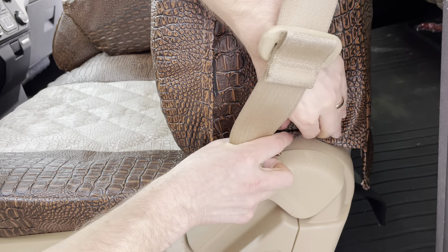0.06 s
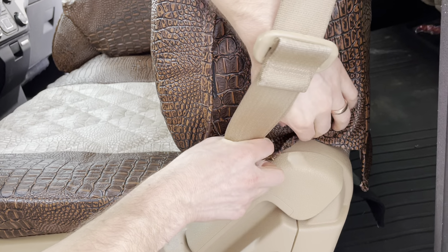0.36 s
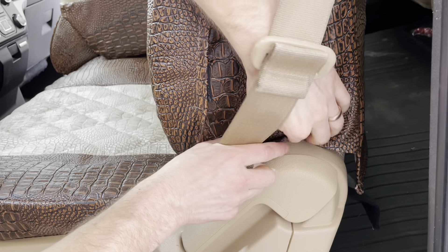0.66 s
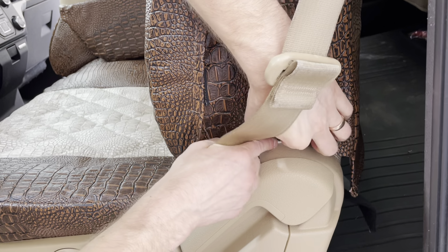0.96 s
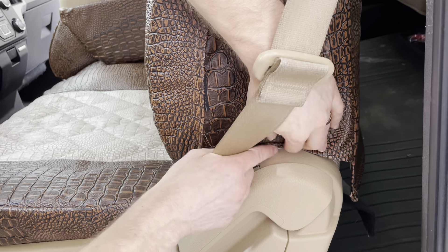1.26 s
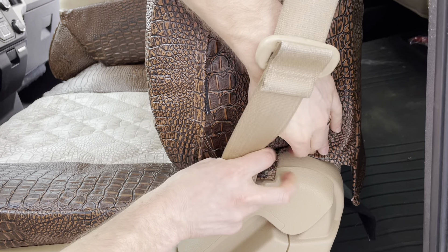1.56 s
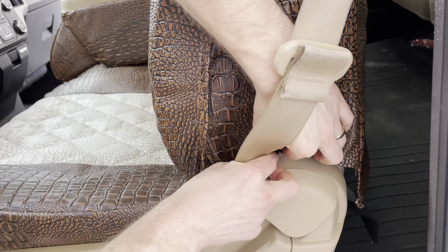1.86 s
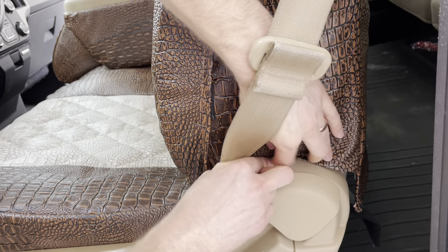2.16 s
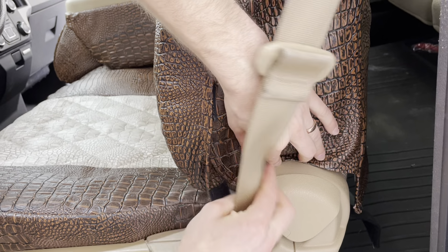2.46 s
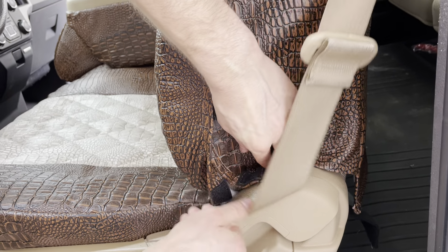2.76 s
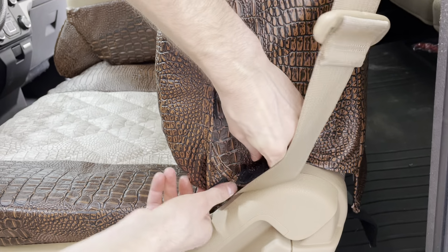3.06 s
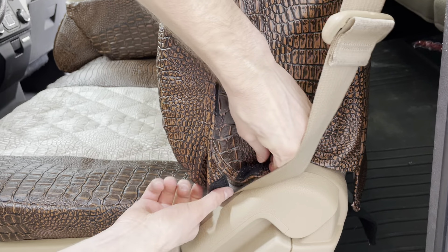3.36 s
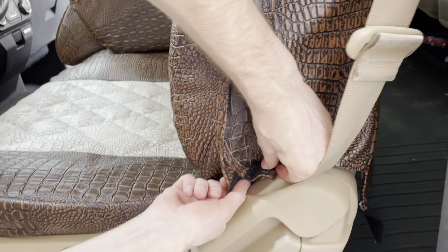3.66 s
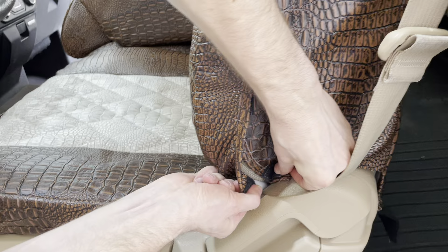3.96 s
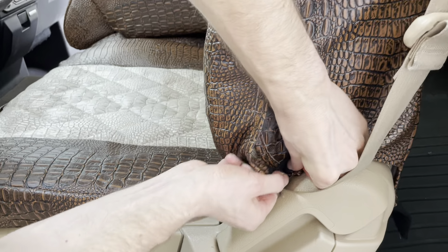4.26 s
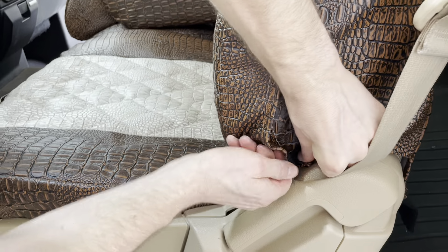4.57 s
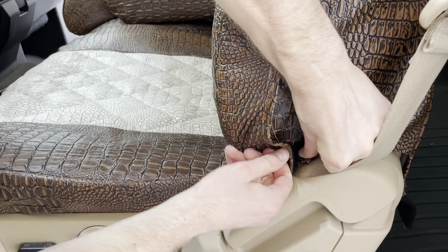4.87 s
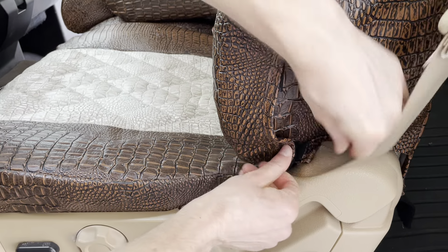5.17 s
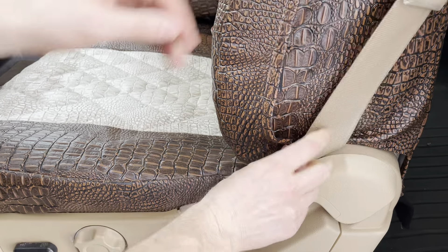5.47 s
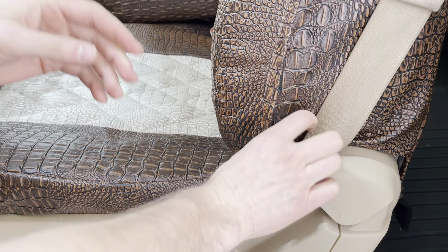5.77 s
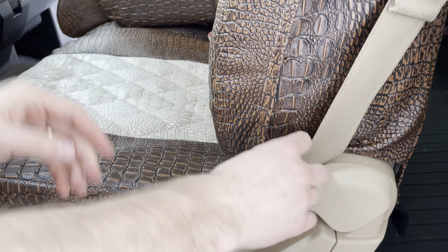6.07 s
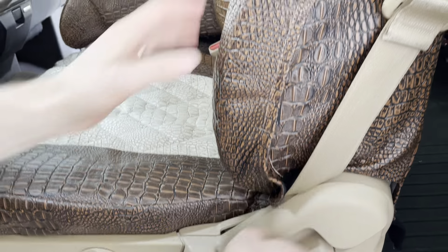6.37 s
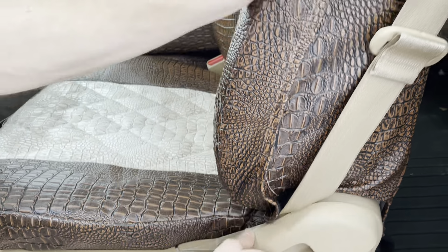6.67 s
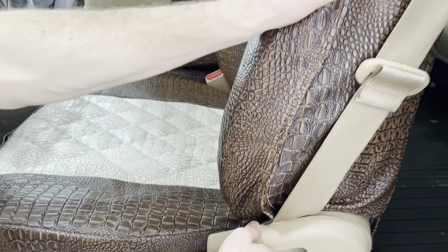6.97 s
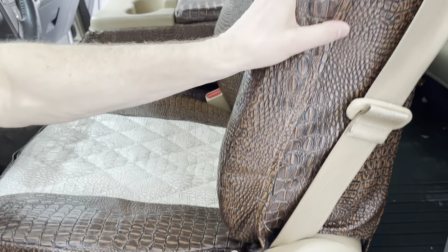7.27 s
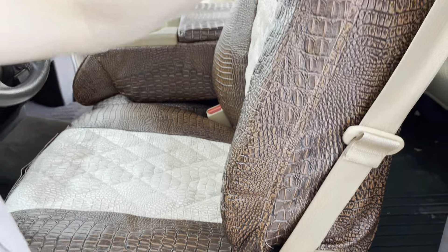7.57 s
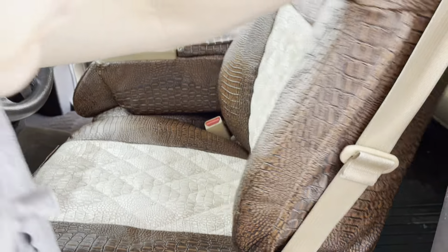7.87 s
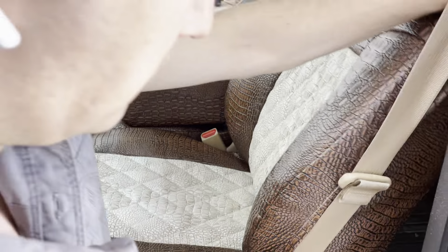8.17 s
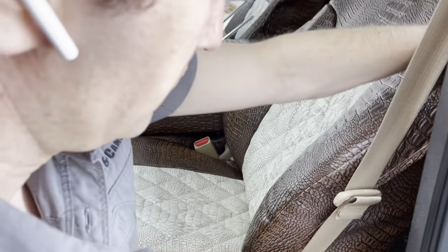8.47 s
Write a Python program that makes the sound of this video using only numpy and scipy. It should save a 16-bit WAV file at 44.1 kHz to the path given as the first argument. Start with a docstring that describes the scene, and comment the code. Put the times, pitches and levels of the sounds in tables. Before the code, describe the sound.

Hands tuck a padded imitation-leather cover around a car seat in short rubbing strokes. The surface crackles, slips on plastic trim with little ticks and plucks, and creaks briefly as it is stretched. Then the backrest is pushed, and the rubbing grows louder, with sharp snaps, dull foam thumps and a quick judder. A stereo microphone hears it from close by, over the faint hush of a parked car.

```python
"""A padded imitation-leather cover rubs and crackles as two hands tuck it around a car seat.
Its grain catches and lets go, its skin slips on the plastic trim in falling plucks, and it creaks as it
is stretched. Then the backrest is pushed: stiff edges snap, the foam booms and the tight cover judders.
A small stereo microphone hears it all from close by, over the faint hush of the parked car."""
import sys
import numpy as np
from scipy import signal
from scipy.fft import rfft, irfft, next_fast_len
from scipy.io import wavfile
from scipy.ndimage import uniform_filter1d

SR = 44100
rng = np.random.default_rng(int(sys.argv[2]) if len(sys.argv) > 2 else 0)


def generate_wav(sig):
    """Save sig (samples, or channels by samples) to the path in sys.argv[1] as 16-bit PCM at SR."""
    pcm = np.round(np.clip(np.atleast_2d(sig).T, -1, 1) * 32767).astype(np.int16)
    wavfile.write(sys.argv[1], SR, pcm)


N = 380141
SIZE = 4096   # samples in one short sound or filter
TIME, AGE = np.arange(N) / SR, np.arange(SIZE) / SR   # seconds into the scene, and into a short sound
HZ = np.maximum(np.fft.rfftfreq(SIZE, 1 / SR), 1)
TREBLE_HZ, CUTOFF_HZ = 3500, 15900   # where the treble starts and ends
PEAK_S = .008   # a burst is loudest this long after it starts

# Table levels are starting values: the functions add their own boosts and cuts.
# a hand draws the cover along the seat:
# (start [s], end [s], scrape [dB], hiss against scrape [dB], push on the foam against scrape [dB])
HAND_STROKES = [(0.15, 0.193, -47.5, -7.5, 3), (0.317, 0.41, -49.5, -12, -3.5),
                (0.444, 0.512, -51.5, -2.5, 0.5), (0.671, 0.767, -48.5, -9.5, -3.5),
                (0.915, 0.963, -47.5, -8, 2), (1.01, 1.073, -44, -17.5, -3), (1.294, 1.317, -49.5, -7.5, 5),
                (1.42, 1.522, -49, -4.5, -4.5), (1.815, 1.97, -51.5, -7, 2.5),
                (1.997, 2.028, -44.5, -2.5, -2.5), (2.11, 2.228, -46.5, -3.5, 2),
                (2.264, 2.337, -50.5, -4.5, 0.5), (2.351, 2.484, -48.5, 0.5, -1),
                (2.5, 2.63, -54.5, 1.5, -1), (2.684, 2.747, -51, -3.5, 5), (2.964, 3.046, -55.5, -3, 2),
                (3.295, 3.502, -54.5, -6.5, 1.5), (3.578, 3.612, -52, -4.5, -3),
                (3.783, 3.957, -46, -12.5, -7), (4.003, 4.082, -45, -5, 1.5), (4.153, 4.361, -47, -8, 0.5),
                (4.534, 4.623, -47, -7, -5), (4.687, 4.812, -50, -4.5, 0.5), (4.986, 5.09, -51.5, -5, -4),
                (5.09, 5.196, -60.5, 2, -3), (5.374, 5.45, -53, -4.5, -6.5),
                (5.535, 5.563, -54.5, -10.5, 1.5), (6.123, 6.187, -55, -11.5, -15)]
# between strokes the resting hands still creep a little: (time [s], scrape [dB])
HAND_CREEP = [(0, -63), (0.25, -55.5), (0.56, -62), (1.1, -54), (2.3, -60), (2.8, -58), (3.25, -60),
              (4.4, -54), (5.3, -59), (6.46, -69)]
# the arm works its way up the backrest without letting go: (time [s], scrape [dB], grip [0-1])
ARM_PATH = [(6.46, -62, 0.8), (6.53, -53, 0.28), (6.7, -45.5, 0.43), (6.83, -39.5, 0.74), (6.9, -54, 0.6),
            (7.07, -65.5, 0.9), (7.1, -53.5, 0.58), (7.25, -53, 0.6), (7.32, -43.5, 0.42), (7.42, -51, 0.3),
            (7.54, -58.5, 0.15), (7.79, -47, 0.53), (7.88, -40, 0.67), (8.1, -43.5, 0.65),
            (8.51, -48, 0.63), (8.55, -35, 0), (8.61, -44.5, 0.66)]
# the skin lets go of the trim: (time [s], tick [dB], pluck [dB], travel time of the pluck [s])
SKIN_SLIPS = [(0.3424, -32, -30, .002), (0.6772, -52, -39.5, .004), (0.694, -45.5, -37.5, 0.0035),
              (0.741, -41.5, -34.5, 0.004), (0.7558, -45, -33.5, 0.0044), (0.8359, -43, -38, 0.0038),
              (0.8514, -38.5, -34, 0.0052), (0.894, -32.5, -28.5, .003), (0.9148, -34, -41, 0.0012),
              (0.9678, -43, -31, .004), (1.012, -28.5, -37, 0.00053), (1.076, -42, -36.5, 0.00083),
              (1.658, -44, -41.5, 0.0019), (1.6645, -47, -35.5, 0.0017), (1.671, -44, -36, 0.0021),
              (1.6874, -47, -34, .003), (1.6941, -43, -33.5, 0.0048), (1.7508, -43, -33.5, .003),
              (1.7718, -44, -31, 0.00192), (1.7802, -39, -31.5, 0.00398), (1.7952, -44, -34.5, 0.00507),
              (1.8145, -62, -39, 0.0066), (1.837, -46, -35.5, 0.0039), (1.8782, -43, -39.5, .003),
              (1.897, -49, -34, .004), (1.943, -44, -33, 0.0039), (1.9615, -44, -42, 0.0018),
              (2.0673, -51, -43, .003), (2.637, -37, -40, 0.00035), (3.817, -41, -34, .003),
              (4.026, -42, -38, 0.0019)]
# the whole tight panel jerks over its foam: (time [s], scuff [dB], wave [dB])
PANEL_JERKS = [(2.4679, -48, -43), (2.917, -39.5, -43), (3.3885, -41.5, -38), (5.358, -38.5, -42),
               (6.8216, -26, -28.5), (7.8456, -28, -28), (8.5479, -33, -28.5)]
# the dragged panel sticks and slips, each slip a knock: (time [s], scuff [dB], wave [dB])
PANEL_KNOCKS = [(7.9805, -34, -28.5), (8.015, -32.5, -28.5), (8.0519, -32.5, -30.5), (8.0955, -29.5, -26),
                (8.154, -32.5, -28.5), (8.2068, -29, -25.5), (8.2505, -32, -29), (8.305, -32, -26),
                (8.3564, -32, -28.5), (8.4113, -29, -29), (8.4707, -30, -28)]
# the padded panel rings after a slip: (pitch [Hz], level [dB], fade time [s])
PANEL_RINGS = [(102.3, 0.5, .016), (256, -7, .01)]
# stiff edges snap; a short scrape swells just before the loudest late snap:
# (time [s], crack [dB], treble [dB], ringing pitch [Hz])
SNAPS_AND_SCRAPE = [(0.3338, -34.5, -49, 4440), (0.3417, -49, -40, 4400), (2.4679, -41, -35.5, 10200),
                    (4.596, -37.5, -40, 4900), (6.7487, -38, -38.5, 9300), (6.776, -27.5, -38, 5240),
                    (7.2831, -33, -45, 8800), (7.2926, -22, -22, 8400), (7.31, -24.5, -35, 9100),
                    (7.3186, -28.5, -43, 5200), (7.331, -33, -47, 5200), (8.533, -31.5, -31, 5140),
                    (8.5488, -22.5, -19.5, 5200), (8.605, -39, -49, 5150)]
# the plastic trim rings with every snap: (pitch [Hz], level [dB], fade time [s])
TRIM_RINGS = [(1465, 6, 0.0059), (1750, 4, 0.0075), (2030, 2, 0.0045), (2250, 2, 0.007), (2610, 1.5, 0.006)]
# creases flick over: (time [s], level [dB], treble [dB])
CREASE_FLICKS = [(0.3658, -50, -48), (0.3813, -44, -45.5), (2.234, -47, -48.5), (2.3573, -53, -41.5),
                 (2.538, -56, -44), (2.5658, -55, -46), (2.6538, -50, -43), (2.683, -52, -44.5),
                 (2.7154, -48, -47), (2.873, -46.5, -49.5), (2.896, -48, -56), (3.084, -60, -54),
                 (3.135, -52, -53), (3.1493, -44, -59), (3.2312, -52.5, -57), (3.295, -54, -51),
                 (3.3434, -57, -50), (3.3698, -50, -50), (3.4695, -59, -54), (3.489, -53, -52),
                 (3.585, -46.5, -55), (4.1274, -50, -67), (4.1514, -44, -51), (4.1872, -42.0, -49),
                 (4.215, -46, -60), (4.2524, -45, -58), (4.44, -41.5, -54), (4.465, -43, -54),
                 (4.4984, -45.5, -55.5), (4.5154, -44, -46), (4.88, -47.5, -74), (4.9504, -48.5, -48),
                 (4.996, -64, -45), (5.2327, -45, -51), (5.2524, -48.0, -58), (5.8198, -44.5, -54),
                 (5.876, -49, -55), (5.8966, -47.5, -61), (5.9123, -52, -50), (5.9293, -48.5, -66),
                 (5.9427, -47.5, -55), (6.0014, -48.5, -66), (6.9659, -49.5, -51), (7.086, -42, -44),
                 (7.0999, -43.5, -48), (7.253, -37, -48), (7.7482, -40, -42)]
# soft blows on the seat: (time [s], level [dB], fade time [s], middle of the boom [Hz])
SEAT_BUMPS = [(5.365, -33.5, 0.018, 98), (6.147, -37.5, 0.066, 237), (6.83, -31.5, 0.071, 202),
              (7.295, -28.5, 0.044, 198), (8.549, -25, 0.02, 180)]
# the stretched cover creaks: (time [s], slip rate [1/s], level [dB])
CREAK_PATH = [(3.63, 55, -48), (3.705, 170, -39.5), (3.77, 105, -39.5), (3.885, 110, -40.5),
              (3.915, 150, -42), (3.955, 35, -41.5), (3.99, 50, -40), (4.03, 145, -41), (4.087, 165, -42)]
# a fingernail runs over the grain: (start [s], end [s], level [dB])
NAIL_RASPS = [(2.358, 2.418, -48.5), (4.96, 5.067, -52)]

# the tone colour of each sound, from low to high: (frequency [Hz], level [dB])
RUB_TONE = [(450, -1), (600, -4), (850, -2), (1100, -4), (1400, 0), (1900, -7), (2600, -6.5), (3500, -12.5),
            (5200, -9.5), (7000, -16.5), (8500, -16.5), (10500, -20), (13000, -24), (15000, -23)]
SNAP_TONE = [(500, 7), (900, -2.5), (1650, -0.5), (2200, -6), (3000, -5.5), (4200, -8.5), (5200, -4.5),
             (7000, -6.5), (10500, -8.5), (15000, -16)]
CREAK_TONE = [(400, -1), (850, -2), (1400, 9.5), (1900, -10), (2500, -5), (3100, -11), (3750, -2),
              (5000, 0), (5900, -6), (7200, -15), (10000, -20), (15000, -24)]
RASP_TONE = [(3300, -7), (4600, 2), (6000, -14)]
CUSHION_TONE = [(45, -32), (75, -5), (130, -3), (250, -1), (450, -7)]
BACKREST_TONE = [(25, -4.5), (60, -3), (105, 2.5), (170, -4.5), (270, -3.5), (450, -9.5)]
RUMBLE_TONE = [(25, -24), (45, -2.5), (80, -0.5), (140, -7)]
# cabin echoes that differ between left and right: (frequency [Hz], level against the direct sound [dB])
ECHO_TONE = [(50, -12), (130, -18.5), (550, -4), (1100, -6), (2000, -13.5), (3300, -6), (5200, -8),
             (7200, -8.5)]


def rubbing():
    """Hands rub the cover: a scrape, a surface hiss and soft, uneven pushes on the foam beneath."""
    arm_db, arm_grip = in_time(ARM_PATH)
    on_backrest = TIME > ARM_PATH[0][0]
    scrape_gain, hiss_gain, push_gain = np.where(on_backrest, smoothing(arm_db, arm_grip), tucking())
    brightness_db = 20 * np.log10(hiss_gain / scrape_gain)
    hand_grip = 0.6 - 0.08 * brightness_db   # a brighter stroke glides more
    grip = np.clip(np.where(on_backrest, arm_grip, hand_grip), .05, .95)
    rub = friction(grip, per_s=2200, size_db=4, clump_db=4.2, spots=12)
    scrape = steady(through(regrip(rub, count=6), response(band(317, TREBLE_HZ))), 0.056)
    hiss = from_db(0.87) * steady(through(rub, response(band(TREBLE_HZ, CUTOFF_HZ))), 0.09)
    pushes = rng.standard_normal(N) * from_db(4.5 * drift(70))
    cushion = steady(through(pushes, response(gains(CUSHION_TONE))), 0.071)
    backrest = steady(through(pushes, response(gains(BACKREST_TONE))), 0.071)
    foam = from_db(2) * np.where(on_backrest, backrest, cushion)
    return scrape_gain * scrape + hiss_gain * hiss + push_gain * foam


def friction(grip, per_s, size_db, clump_db, spots):
    """The grain catches and lets go in clumps, at spots that shift with the hand; gliding adds hiss."""
    clumps = from_db(clump_db * grip * (drift(150) + .7 * drift(40)))
    sizes = from_db(size_db * grip * np.minimum(rng.exponential(1, N), 5)) * rng.choice([-1, 1], N)
    clicks = sizes * clumps * (rng.random(N) < per_s / SR)
    spot = np.floor(spots / 4 * drift(7) + 1.3 * rng.standard_normal(N)) % spots
    colours = gains(RUB_TONE) * ripples(3.5, spots)
    rings = bursts(colours, spots, rise_s=0.00014, decay_s=0.00015, tail_db=-24, tail_s=0.0035)
    grains = sum(through(clicks * (spot == k), ring) for k, ring in enumerate(rings))
    sheen = 1 + 1.7 / (1 + (7500 / HZ) ** 8)   # a light glide is airier
    glide = noise(gains(RUB_TONE) * sheen)
    return grip * steady(grains, .1) + .7 * (1 - grip) * steady(glide, .08)


def regrip(rub, count, holds_per_s=5, hollow_hz=1400, width_hz=150, lift_db=4):
    """The trim sounds hollow under the hands; each new hold fades into a slightly different colour."""
    centres = hollow_hz * 2 ** (.13 * rng.standard_normal((count, 1)))
    hollows = from_db(lift_db / (1 + ((HZ - centres) / width_hz) ** 2))
    colours = hollows * ripples(1.8, count)
    shares = (np.maximum(1 - np.abs((TIME * holds_per_s - k) % count - 1), 0) for k in range(count))
    return sum(share * through(rub, impulse) for share, impulse in zip(shares, response(colours)))


def tucking(attack_s=0.05, release_s=0.02):
    """How strong scrape, hiss and push are as the hands tuck: the strongest contact leads."""
    scrape = from_db(in_time(HAND_CREEP)[0])
    hiss, push = scrape * from_db(-7.5), scrape * from_db(0.5)
    for start, end, db, hiss_db, push_db in HAND_STROKES:
        speeding_up = np.clip(1 + (TIME - start) / attack_s, 0, 1)
        speed = speeding_up * np.exp(-np.maximum(TIME - end, 0) / release_s)
        scrape = np.maximum(scrape, from_db(db) * speed)
        hiss = np.maximum(hiss, from_db(db + hiss_db) * speed)
        push = np.maximum(push, from_db(db + push_db) * speed)
    return scrape, hiss, push


def smoothing(scrape_db, grip):
    """The same three strengths on the backrest: a glide is bright, a firm grip dull and moves the foam."""
    hiss_db = scrape_db + 7 - 25.5 * grip
    push_db = scrape_db - 2.5 + 11.5 * grip
    return from_db([scrape_db, hiss_db, push_db])


def skin_slips():
    """The skin sticks, then slips: a tick, and a pluck that is dry when near and falls in pitch when far."""
    s, tick_db, pluck_db, travel_s = np.transpose(SKIN_SLIPS)
    ticks = cracks(s, SNAP_TONE, tick_db, tick_db - 8, low_hz=665,
                   rise_s=0.00091, decay_s=0.0016, tail_db=-16.5, tail_s=0.014)
    plucks = bending_waves(s, pluck_db, travel_s, low_hz=320, high_hz=1670,
                           slope=1.52, echo_db=-12.5, echo_s=0.015)
    return ticks + plucks


def jerks():
    """Single tugs free the panel all at once."""
    s, scuff_db, wave_db = np.transpose(PANEL_JERKS)
    return panel_slips(s, scuff_db, scuff_db - 11, wave_db, rise_s=.0013)


def judder(start_s=7.864, end_s=7.96, period_s=.0175):
    """The panel sticks and slips over and over: first a quick flutter, then slower knocks."""
    flutter = [(s, -36, -29.5) for s in np.arange(start_s, end_s, period_s)]
    s, scuff_db, wave_db = np.transpose(flutter + list(PANEL_KNOCKS))
    return panel_slips(s, scuff_db, scuff_db - 17, wave_db, rise_s=0.0035)


def panel_slips(s, scuff_db, treble_db, wave_db, rise_s):
    """The tight panel slips: a scuff, a wave that sinks into the bass, and a ringing thud."""
    scuffs = cracks(s, SNAP_TONE, scuff_db, treble_db, low_hz=360,
                    rise_s=rise_s, decay_s=0.0029, tail_db=-14.5, tail_s=0.023)
    waves = bending_waves(s, wave_db - 1.5, travel_s=0.0052, low_hz=110, high_hz=700,
                          slope=.9, echo_db=-3, echo_s=0.007)
    tunings = np.exp(.14 * rng.standard_normal(len(s)))   # the tension differs from slip to slip
    thuds = np.array([sum(from_db(db) * ping(hz * tuning, decay_s) for hz, db, decay_s in PANEL_RINGS)
                      for tuning in tunings])
    return scuffs + waves + place(s + 0.00944, wave_db, thuds)


def snaps():
    """Stiff edges crack with a bright ring and set the trim ringing; one short scrape is made alike."""
    s, crack_db, treble_db, ring_hz = np.transpose(SNAPS_AND_SCRAPE)
    resonance = 1 + from_db(13) / (1 + ((HZ / ring_hz[:, None] - 1) / 0.05) ** 2)
    crack = cracks(s, SNAP_TONE, crack_db, treble_db, low_hz=730,
                   rise_s=0.00096, decay_s=0.0049, tail_db=-30, tail_s=0.024, resonance=resonance)
    rings = np.array([from_db(db) * ping(hz, decay_s) for hz, db, decay_s in TRIM_RINGS])
    shape = (len(s), len(rings))
    strengths = rng.choice([-1, 1], shape) * from_db(2 * rng.standard_normal(shape))
    return crack + place(s, crack_db - 3, strengths @ rings)


def creases(crinkles_per_s=8):
    """Creases flick over with a light tick; tiny ones crinkle at random under the tucking hands."""
    at = np.flatnonzero((rng.random(N) < crinkles_per_s / SR) & (TIME < ARM_PATH[0][0]))
    scrape_db = 20 * np.log10(tucking()[0][at])
    tiny_db = scrape_db - 6 + 2 * rng.standard_normal(len(at))
    s, db, treble_db = np.hstack([np.transpose(CREASE_FLICKS), [TIME[at], tiny_db, tiny_db + 3.5]])
    softness = np.maximum(db - treble_db, 0)[:, None] / 20   # a soft crease is darker in the middle too
    return cracks(s, RUB_TONE, db, treble_db, low_hz=726, tilt=(HZ / TREBLE_HZ) ** -softness,
                  rise_s=0.0011, decay_s=0.0011, tail_db=-7.5, tail_s=0.006)


def bumps(span=2.12):
    """The padded seat answers a blow with a dull boom that the foam soaks up."""
    booms = np.zeros(N)
    for s, db, decay_s, hz in SEAT_BUMPS:
        boom = steady(noise(band(hz / span, hz * span) * HZ ** -.3), 0.0184)
        fade = (TIME > s) * np.exp(-np.abs(TIME - s) / decay_s)
        booms += from_db(db) * boom * fade
    return booms


def creak(trail_s=.006, trail_db=-12, spread_db=3):
    """The stretched cover creaks: a run of sharp, uneven slips, each trailed by a weaker one."""
    per_s, level_db = in_time(CREAK_PATH)
    stretching = (TIME > CREAK_PATH[0][0]) * (TIME < CREAK_PATH[-1][0])
    at = slip_train(per_s * stretching, jitter_db=1.9)
    s = np.concatenate([at / SR, at / SR + rng.uniform(0, trail_s, len(at))])
    db = np.concatenate([level_db[at], level_db[at] + trail_db]) + spread_db * rng.standard_normal(len(s))
    ticks = response(gains(CREAK_TONE) * ripples(3, len(s)))
    tails = bursts(gains(CREAK_TONE), len(s), rise_s=.0004, decay_s=.0007, tail_db=-16, tail_s=.004)
    return place(s, db - 9, ticks) + place(s - PEAK_S, db - 3, tails)


def squeak(start_s=1.584, end_s=1.606, per_s=620, level_db=-39):
    """A finger squeaks on the cover: fast, nearly regular slips make the skin ring at three pitches."""
    slips_so_far = np.floor(np.cumsum(per_s * from_db(3 * drift(700))) / SR)
    pulses = np.diff(slips_so_far, prepend=0) * (TIME > start_s) * (TIME < end_s)
    voice = through(pulses, ping(1450, 0.0021) + ping(2900, 0.001) + .5 * ping(4900, 0.00053))
    return from_db(level_db) * voice / np.sqrt(np.sum(voice ** 2) / ((end_s - start_s) * SR))


def rasps(per_s=260):
    """A fingernail runs over the raised grain: quick, bright little ticks."""
    runs = np.zeros(N)
    for start, end, db in NAIL_RASPS:
        at = slip_train(per_s * (TIME > start) * (TIME < end), jitter_db=3)
        ticks = bursts(gains(RASP_TONE), len(at), rise_s=.0002, decay_s=.0005, tail_db=-20, tail_s=.003)
        runs += place(at / SR - PEAK_S, db - 7 + 2 * rng.standard_normal(len(at)), ticks)
    return runs


def cabin(hush_db=-62, rumble_db=-59, waver_db=3.5):
    """The steady hush of the parked car and microphone, over the uneven rumble of the handled seat."""
    hush = noise(band(45, CUTOFF_HZ) * HZ ** -.7)
    rumble = noise(gains(RUMBLE_TONE))
    rumble_gain = from_db(rumble_db + waver_db * drift(12))
    return from_db(hush_db) * hush / np.std(hush) + rumble_gain * rumble / np.std(rumble)


def cracks(s, tone, crack_db, treble_db, low_hz, rise_s, decay_s, tail_db, tail_s, resonance=1, tilt=1):
    """One crack at each time s, each with its own colour; the treble dies sooner than the middle."""
    gain = gains(tone) * ripples(2.3, len(s))
    middle = bursts(gain * tilt * band(low_hz, TREBLE_HZ), len(s), rise_s, decay_s, tail_db, tail_s)
    top = bursts(gain * resonance * band(TREBLE_HZ, CUTOFF_HZ), len(s), rise_s, decay_s / 2, tail_db, tail_s)
    start = s + .0005 - PEAK_S
    return place(start, crack_db, middle) + place(start, treble_db, top)


def bursts(gain, count, rise_s, decay_s, tail_db, tail_s):
    """Letting go is a flurry of tiny breaks: coloured noise that swells and dies away, one row each."""
    after = np.maximum(AGE - PEAK_S, 0)
    swell = np.exp(np.minimum(AGE - PEAK_S, 0) / rise_s)
    fade = np.exp(-after / decay_s) + from_db(tail_db) * np.exp(-after / tail_s)
    return irfft(rfft(rng.standard_normal((count, SIZE)) * swell * fade) * rfft(response(gain)))


def bending_waves(s, wave_db, travel_s, low_hz, high_hz, slope, echo_db, echo_s):
    """High notes run faster through a bending sheet, so each slip arrives as a falling chirp."""
    pitch = np.exp(0.14 * rng.standard_normal((len(s), 1)))
    phase = 4 * np.pi * np.reshape(travel_s, (-1, 1)) * (np.sqrt(1000 * HZ) - HZ / 4)
    gain = HZ ** -slope * band(low_hz * pitch, high_hz * pitch)
    echoes = rng.standard_normal((len(s), SIZE)) * np.exp(-AGE / echo_s) * np.sqrt(2 / (echo_s * SR))
    waves = irfft(gain * np.exp(-1j * phase) * (1 + from_db(echo_db) * rfft(echoes)))
    fade = np.minimum(1, 2 * (1 - AGE / AGE[-1])) ** 2
    return place(s, wave_db, waves * fade)


def slip_train(per_s, jitter_db):
    """Sample numbers of slips that follow one another at a nearly regular pace."""
    slips_so_far = np.floor(np.cumsum(per_s * from_db(jitter_db * drift(170))) / SR)
    return np.flatnonzero(np.diff(slips_so_far))


def ripples(depth_db, count):
    """Every spot of the cover rings in its own way: random peaks and dips, one row a spot."""
    knots = np.log(np.geomspace(200, 16000, 30))
    heights = rng.standard_normal((count, len(knots)))
    return from_db(depth_db * np.array([np.interp(np.log(HZ), knots, row) for row in heights]))


def ping(hz, decay_s):
    """One pure tone that dies away."""
    return np.sin(2 * np.pi * hz * AGE) * np.exp(-AGE / decay_s)


def noise(gain):
    """Steady noise with this gain at each frequency."""
    return through(rng.standard_normal(N), response(gain))


def drift(per_s):
    """A random wobble, about 1 in size, that takes per_s new values a second."""
    knots = rng.standard_normal(20000)
    return np.interp(TIME * per_s, np.arange(len(knots)), knots)


def place(times, levels_db, sounds):
    """Lay one sound at each time; its level is its energy spread over 10 ms."""
    track = np.zeros(N + SIZE)
    sounds = sounds / np.sqrt(np.sum(sounds ** 2, axis=1, keepdims=True) / (.01 * SR))
    for s, db, sound in zip(times, levels_db, sounds):
        start = int(np.clip(s * SR, 0, N))
        track[start:start + SIZE] += from_db(db) * sound
    return track[:N]


def steady(x, span_s):
    """Hold the average level near 1, keeping flickers shorter than span_s."""
    power = np.maximum(uniform_filter1d(x * x, int(span_s * SR)), 0)
    return x / np.sqrt(power + 1e-4 * np.mean(x * x))


def from_db(db):
    """Turn decibels into a gain, the number a signal is multiplied by."""
    return 10 ** (np.asarray(db) / 20)


def in_time(rows):
    """Join a table's rows with straight lines, giving each column at every sample."""
    s, *columns = np.transpose(rows)
    return [np.interp(TIME, s, column) for column in columns]


def gains(tone):
    """Turn a tone table into a gain at each frequency, falling steeply past its ends."""
    hz, db = np.transpose(tone)
    return from_db(np.interp(np.log(HZ), np.log(hz), db)) * band(0.72 * hz[0], 1.25 * hz[-1])


def band(low_hz, high_hz):
    """Gains that keep what lies between two frequencies."""
    return ((1 + (low_hz / HZ) ** 8) * (1 + (HZ / high_hz) ** 8)) ** -.5


def response(gain):
    """How a filter with these gains answers one click, as early as it can (minimum phase)."""
    cepstrum = irfft(np.log(gain + 1e-6))
    cepstrum[..., 1:SIZE // 2] *= 2   # move what would come before the click to after it
    cepstrum[..., SIZE // 2 + 1:] = 0
    return irfft(np.exp(rfft(cepstrum)))


def through(x, impulse):
    """Send a signal through a filter, given as its answer to one click."""
    return signal.oaconvolve(x, impulse)[:N]


def scene():
    """Everything is within arm's reach; a spray of quick echoes reaches left and right differently."""
    direct = rubbing() + skin_slips() + jerks() + judder() + snaps() + creases()
    direct = direct + squeak() + bumps() + creak() + rasps() + cabin()
    scatter = rfft(rng.standard_normal(SIZE) * (AGE > .002) * np.exp(-AGE / .009))
    scatter_colour = np.sqrt(uniform_filter1d(np.abs(scatter) ** 2, size=15))
    echoes = scatter / rfft(response(scatter_colour))   # even out the chance colour
    echo_colour = rfft(response(gains(ECHO_TONE) * band(48, 7060)))
    side = through(direct, irfft(echoes * echo_colour))
    return np.array([direct + side, direct - side]) * from_db([[.45], [-.45]])


def record(dry, lag_s=.000138):
    """The microphone flips and slightly delays the high treble on the left; both sides lose the very top."""
    size = next_fast_len(N + SIZE)
    hz = np.fft.rfftfreq(size, 1 / SR)
    treble = np.clip((hz - 5800) / 1200, 0, 1)
    phase = treble * (np.pi - 2 * np.pi * hz * lag_s)
    left = irfft(rfft(dry[0], size) * np.exp(1j * phase), size)[:N]
    top_cut = signal.ellip(10, .2, 80, CUTOFF_HZ, fs=SR, output="sos")
    return signal.sosfilt(top_cut, [left, dry[1]])


dry = scene()
out = record(dry)
generate_wav(out)
```